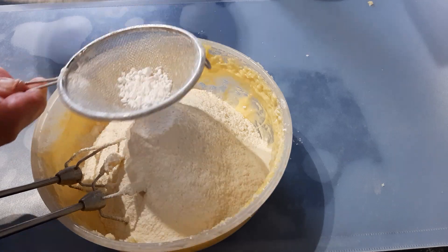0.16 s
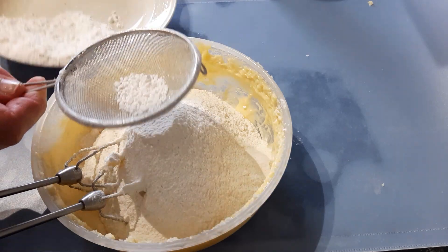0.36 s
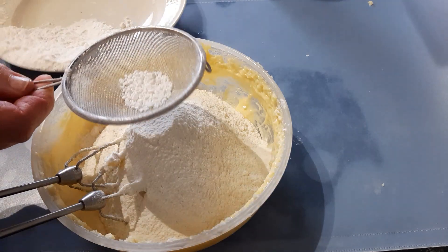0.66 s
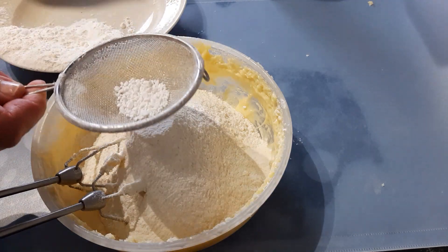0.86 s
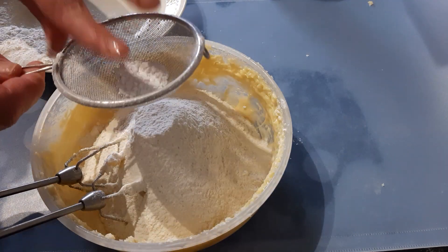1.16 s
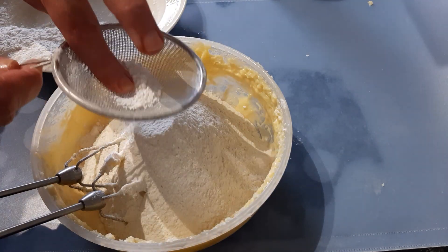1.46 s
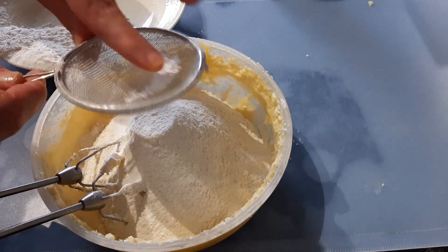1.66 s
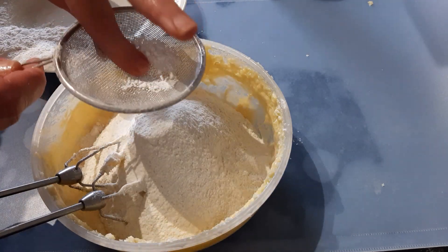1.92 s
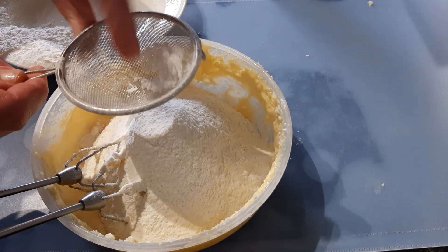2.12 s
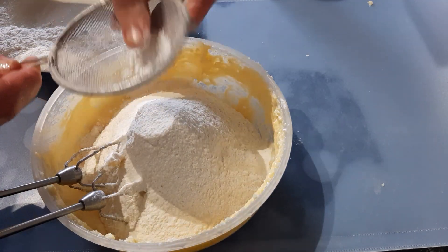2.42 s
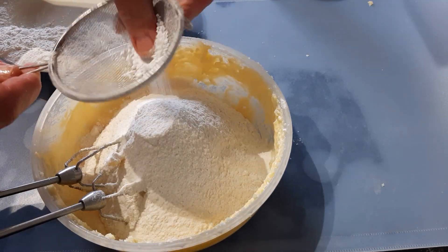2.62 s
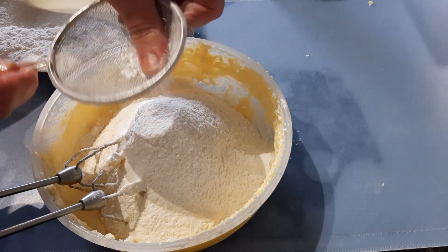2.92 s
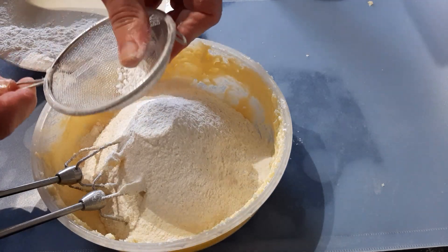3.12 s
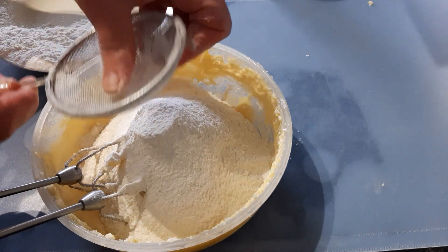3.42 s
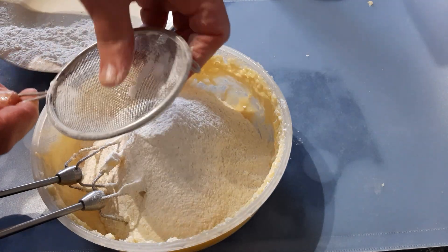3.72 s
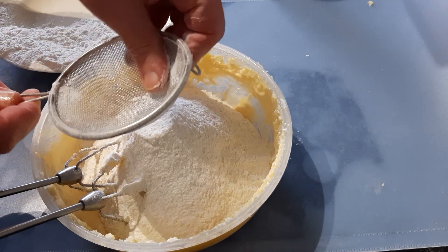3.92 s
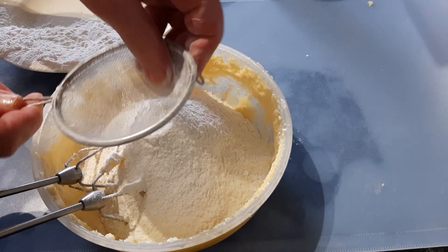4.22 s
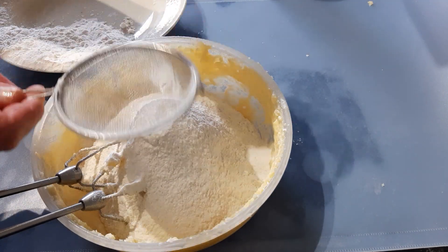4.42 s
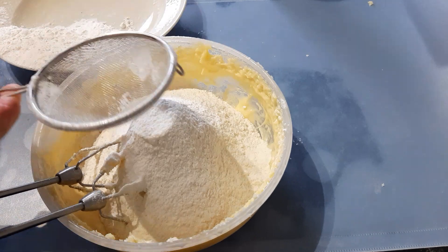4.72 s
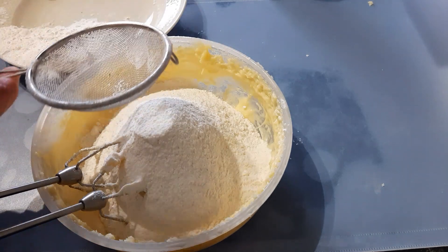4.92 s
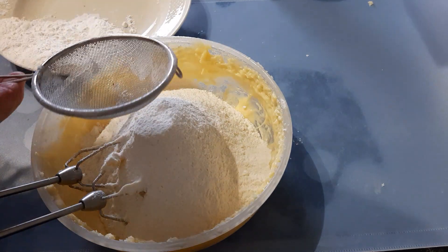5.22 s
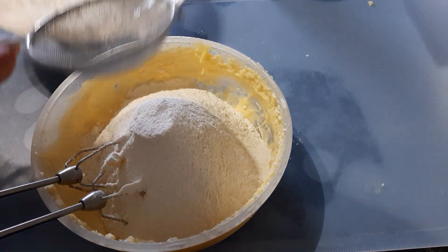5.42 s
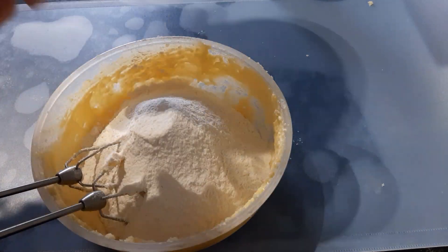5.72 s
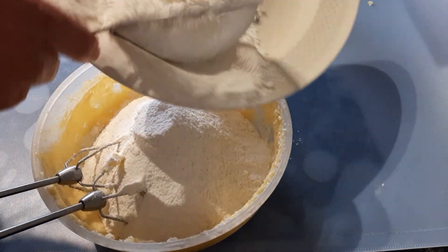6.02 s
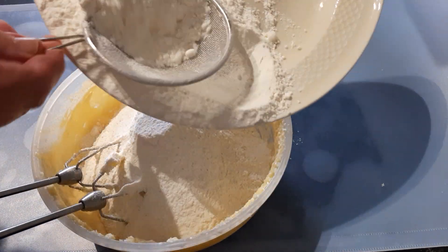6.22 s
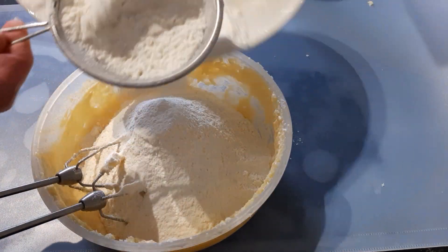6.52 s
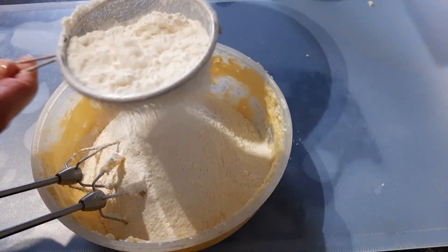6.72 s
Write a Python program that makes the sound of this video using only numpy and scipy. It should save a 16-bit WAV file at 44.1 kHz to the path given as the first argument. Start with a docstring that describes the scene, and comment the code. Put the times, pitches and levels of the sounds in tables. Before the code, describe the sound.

A low, wavering rumble leaning left, faint smooth hiss and barely audible electrical tones run throughout, closely miked in a small room. At 0 s a brief powdery hiss fades. At about 0.4 s a dish thumps hollowly on the table, the loudest event, rocking with more knocks at 0.57 and 0.7 s, and a short woody ring. After quiet, fingertip rubs begin around 1.4 s: small dry, bright grating dabs on wire mesh until 2.2 s, then longer, firmer strokes near 2.7, 3.0, 3.3, 3.6 and 3.9 s, the sharpest at 4.2 s. A deep hum sits under 3.8-5 s. A light hollow knock comes at 4.7 s, a soft dragging scuff at 5.1 s, another tick at 5.3 s. From 5.6 to 6.4 s the strainer scrapes with thin metallic ringing and crunches into flour, with a quick rattle around 6.1 s. Very soft sifting ends it.

```python
"""A low rumble, a faint hiss and thin electrical tones (wavering sines and filtered noise) run throughout.
A finger rubs flour on a small wire strainer (filtered grains); near the start a dish of flour rocks to rest
on the table with hollow thumps (decaying sines and noise). More rubs follow, and a deep hum comes for a second.
Small knocks (noise bursts) and a slide of the dish (grains) lead to the strainer scooping up more flour, with
crunching and ringing (grains through resonances). Soft sifting ends the scene."""
import sys
import numpy as np
from scipy import signal
from scipy.fft import rfft, irfft
from scipy.io import wavfile

SR = 44100
rng = np.random.default_rng(int(sys.argv[2]) if len(sys.argv) > 2 else 0)


def materialize(psi):
    """Save the field psi as 16-bit PCM at rate SR to the path in sys.argv[1].

    A 1-D psi becomes a single channel; in a 2-D psi each row is a channel.
    """
    bounded = np.clip(np.atleast_2d(psi).T, -1, 1)
    quanta = np.round(bounded * 32767).astype(np.int16)
    wavfile.write(sys.argv[1], SR, quanta)


N = 302481
T = np.arange(N) / SR  # time of every sample, in seconds

# hiss of powder on wire: pitch_hz, level_db
POWDER_COLOUR = [(1500, -42), (3300, -22.5), (4300, -0.5), (4750, -2.5), (5600, -0.5), (8000, 3),
                 (12000, 7), (15500, 7)]
# resonances of the strainer's wire rim: pitch_hz, width_hz, level_db
RIM_MODES = [(3850, 120, 4.5), (4930, 120, -2), (5350, 170, 0.5), (5720, 150, -0.5), (6220, 150, 3.5),
             (7530, 180, -5), (8400, 210, 0.5), (9470, 160, 0.5), (10930, 190, -2), (12100, 300, -11),
             (13100, 320, -4.5), (14900, 310, -6)]


def undb(db):
    """Turn decibels into a gain."""
    return 10 ** (np.asarray(db) / 20)


def unit(x):
    """Scale a sound to an rms of 1."""
    return x / np.sqrt(np.mean(x ** 2))


def along(points, hz):
    """Read (pitch_hz, value) points along a logarithmic pitch axis."""
    f, value = np.transpose(points)
    return np.interp(np.log(hz + 1), np.log(f), value)


def shaped(x, gain, size=8192):
    """Filter a sound with a gain that depends on pitch, without any sound before its cause."""
    hz = np.arange(size // 2 + 1) * SR / size
    cepstrum = irfft(np.log(gain(hz) + 1e-7))
    # folding the cepstrum forward gives a minimum-phase filter
    cepstrum[1:size // 2] *= 2
    cepstrum[size // 2 + 1:] = 0
    impulse = irfft(np.exp(rfft(cepstrum)))
    return signal.oaconvolve(x, impulse[None], axes=1)[:, :x.shape[1]]


def coloured(x, points):
    """Filter a sound with a (pitch_hz, level_db) curve."""
    return shaped(x, lambda hz: undb(along(points, hz)))


def resonance(hz, centre, width):
    """Gain of one resonance with steep flanks."""
    return 1 / (1 + (2 * (hz - centre) / width) ** 2)


def ringing(x, table):
    """Pass a sound through a set of (pitch_hz, width_hz, level_db) resonances."""
    return shaped(x, lambda hz: sum(undb(db) * resonance(hz, centre, width) for centre, width, db in table))


def pan(db):
    """Left and right gains for a left-minus-right level difference."""
    return undb(np.array([[db], [-db]]) / 2)


def noise(size=N):
    """Diffuse noise at two close microphones: alike in the bass, less related in the treble."""
    mid, side = rng.standard_normal((2, size))
    treble_only = signal.butter(1, 600, "high", fs=SR, output="sos")
    side = signal.sosfilt(treble_only, side)
    return np.array([mid + side, mid - side]) / np.sqrt(2)


def walk(rate):
    """Slow random wander with a spread near 1, taking `rate` steps a second."""
    steps = rng.standard_normal(int(N / SR * rate) + 2)
    return np.interp(T * rate, np.arange(len(steps)), steps)


def grains(rate, unevenness):
    """A dense rain of tiny clicks, about `rate` a second, with sizes spread by `unevenness`."""
    lands = rng.random(N) < rate / SR
    sizes = np.exp(unevenness * rng.standard_normal(N))
    return unit(lands * sizes * noise())


def fade(t60, size=SR):
    """Exponential decay of unit energy that drops 60 dB in t60 seconds."""
    shape = np.exp(-np.log(1000) * T[:size] / t60)
    return shape / np.sqrt(np.sum(shape ** 2))


def add(out, s, sound):
    """Mix a sound in at s seconds."""
    start = int(s * SR)
    out[:, start:start + sound.shape[1]] += sound[:, :N - start]


def tone(hz, waver, jitter_s=0):
    """A sine of rms near 1 whose phase and level wander."""
    clock = T + jitter_s * walk(220)
    wave = np.sin(2 * np.pi * hz * clock + waver * walk(16))
    return np.sqrt(2) * wave * undb(2 * waver * walk(5))


def swell(start, db, rise, fall):
    """Gain of one rubbing movement: it builds to a peak and dies away."""
    depth_db = 21.5  # how far under its peak the gain is at the start and after the fall time
    shape = 1.62  # 1 is a pointed peak, 2 a round one
    since_peak = T - start - rise
    distance = np.maximum(-since_peak / rise, since_peak / fall)
    return undb(db - depth_db * distance ** shape)


def held(start, db, length):
    """Gain that fades in, holds and fades out."""
    fade_s = .1
    time_to_edge = np.minimum(T - start, start + length - T)
    return undb(db) * np.clip(time_to_edge / fade_s, 0, 1)


def background():
    """A wavering, droning rumble, smooth hiss and thin steady tones, joined for a while by a deep hum."""
    # rumble level before mixing and panning: time_s, level_db
    rumble_levels = [(1.1, -64.5), (1.74, -70.5), (2.17, -62), (2.35, -71), (2.48, -64), (4.18, -65.5),
                     (4.24, -59), (4.4, -69), (5.06, -60.5), (5.24, -67), (6.52, -66.5), (6.68, -77),
                     (6.76, -59.5), (6.86, -66.5)]
    # spectrum of the rumble noise: pitch_hz, level_db
    rumble_colour = [(15, -39), (25, -14.5), (44, -10), (98, -3.5), (158, -9.5), (198, -9), (220, -10.5),
                     (248, -3), (275, -16), (297, -9), (325, -24.5), (413, -29), (533, -27), (574, -28.5),
                     (900, -39), (1170, -58), (1980, -120)]
    # droning tones inside the rumble: pitch_hz, level_db (against each other)
    drone_tones = [(87, -11), (100, -2.5), (124, -7.5), (170, -16.5), (198.5, -10.5), (247, -10),
                   (296, -16.5)]
    # deep hum that comes on, before panning: start_s, level_db, length_s
    hum_spells = [(3.8, -66.5, 1.2)]
    # steady hum and whine, before panning: pitch_hz, level_db
    whine_tones = [(46, -79), (59.2, -77.5), (3058, -89), (7300, -91)]
    # spectrum of the faint steady hiss: pitch_hz, level_db
    air_colour = [(300, -3), (600, -1.5), (1000, -9), (2000, -12), (5000, -19), (10000, -19), (15500, -16)]
    hum_hz = 59.67
    jitter_s = .00006  # timing jitter that widens the high whine

    drone = sum(undb(db) * tone(hz, waver=0.32) for hz, db in drone_tones)
    rumble_noise = unit(coloured(noise(), rumble_colour))
    level = undb(np.interp(T, *np.transpose(rumble_levels)))
    rumble = level * (undb(-4.5) * rumble_noise + undb(-4.0) * drone)
    hum = sum(held(*row) for row in hum_spells) * tone(hum_hz, waver=.2)
    low = (rumble + hum) * pan(10.5)
    whine = sum(undb(db) * tone(hz, waver=0.99, jitter_s=jitter_s) for hz, db in whine_tones)
    air = unit(coloured(noise(), air_colour))
    return low + undb(-76.5) * air * pan(1.5) + whine * pan(9.7)


def finger():
    """Powder grates through the wires and trickles on; firmer strokes also scrape the mesh itself."""
    # strokes or dabs on the mesh, or flour sifting through it; level is that of the powder hiss before mixing:
    # start_s, level_db, rise_s, fall_s
    strokes = [(0.0, -63, 0.0039, 0.095), (0.01, -71, 0.091, 0.32), (1.36, -67.5, 0.1, 0.14),
               (1.48, -61.5, .025, 0.036), (1.49, -67.5, 0.067, 0.089), (1.712, -63, 0.02, 0.033),
               (1.755, -71.5, .022, 0.031), (1.76, -65, .18, .19), (1.9, -61.5, 0.081, .11),
               (1.958, -58.5, 0.015, .025), (2.152, -65.5, 0.02, 0.047), (2.16, -77.5, .05, 0.15),
               (2.47, -67.5, 0.03, 0.15), (2.57, -58.5, .12, .095), (2.895, -67.5, 0.031, 0.11),
               (2.935, -52.5, 0.11, 0.071), (3.24, -53.5, 0.099, 0.074), (3.49, -59.5, 0.05, 0.087),
               (3.555, -52, .075, 0.072), (3.81, -63, 0.063, 0.064), (3.87, -57, 0.065, 0.083),
               (4.185, -49, 0.042, 0.091), (4.462, -73, 0.019, 0.086), (4.56, -75, 0.17, 0.24),
               (6.4, -76, 0.15, .25), (6.7, -76.5, 0.046, .25)]
    # lower voice of the mesh under a firm finger: pitch_hz, level_db
    mesh_colour = [(700, -11), (1400, -12), (1750, -9.5), (2000, -4), (2300, -3), (2700, -4), (3300, -4),
                   (4300, -1), (6000, 1.5), (10000, -9)]
    firm_db, mesh_db = -55, -11  # a firm stroke's hiss, and the mesh against it, before mixing
    mesh_growth = 1.4  # above 1, so the mesh grows faster than the hiss as the finger presses harder
    trickle_db, trickle_t60_s = -20, .5  # loose powder against the stroke, and how long it runs on

    rubbing = np.sqrt(sum(swell(*row) ** 2 for row in strokes))
    lingering_power = signal.oaconvolve(rubbing ** 2, fade(trickle_t60_s) ** 2)[:N]
    trickle = undb(trickle_db) * np.sqrt(np.abs(lingering_power))
    scraping = undb(firm_db + mesh_db) * (rubbing / undb(firm_db)) ** mesh_growth
    powder = unit(coloured(grains(rate=10000, unevenness=0.25), POWDER_COLOUR))
    hiss = np.hypot(rubbing, trickle) * powder
    mesh = scraping * unit(coloured(grains(rate=11000, unevenness=0.17), mesh_colour))
    catching = undb(1.0 * walk(250))  # quick random flutter in level
    return catching * (undb(3.5) * hiss * pan(1) + undb(4.5) * mesh * pan(4.3))


def kitchen():
    """Diffuse reverberation of the room; the treble mostly dies sooner than the bass."""
    # colour of the room's answer: pitch_hz, level_db
    room_colour = [(50, -25.5), (85, -0.5), (170, -3.5), (310, 3), (400, -6), (480, 1.5), (800, -1.5),
                   (1200, -4.5), (1800, -11), (3000, -13), (3900, -2), (5000, 0.5), (15000, -15)]
    # how long each pitch region lasts: pitch_hz, t60_s (time to drop 60 dB)
    room_decay = [(80, .45), (300, .42), (1000, .38), (3000, 0.29), (8000, 0.32), (15000, .27)]
    wash = rfft(noise(size=SR))
    hz = np.arange(SR // 2 + 1)
    centres = [f for f, t60 in room_decay]
    tail = 0
    # each row of the identity matrix picks out one overlapping pitch band
    for (f, t60), share in zip(room_decay, np.eye(len(centres))):
        band = irfft(wash * np.interp(hz, centres, share))
        tail = tail + band * fade(t60)
    build_up = 1 - np.exp(-T[:SR] / 0.0069)
    return coloured(tail * build_up, room_colour)


def dish():
    """Each blow rings the same table and room; a softer contact takes away the treble."""
    # the dish meets the table; levels are relative, the click's against the blow:
    # time_s, level_db, contact_cutoff_hz, click_level_db, left_minus_right_db
    thumps = [(0.4149, 4.5, 1460, -34.5, 2), (0.427, -12, 694, -50.5, -0.5), (0.444, -19, 1166, -49, 1.5),
              (0.474, -16, 606, -35, 0), (0.5734, -1.5, 1120, -41, 3), (0.682, -8.5, 1200, -66.5, 5),
              (0.689, -3, 1120, -38.5, 3), (0.7142, -0.5, 1810, -28, 2.5)]
    # table top and dish ring together, at relative levels, with a pan added to the thump's:
    # pitch_hz, level_db, t60_s, left_minus_right_db
    table_modes = [(87.5, -13, 0.15, 3.5), (99.7, -4, .42, 8.5), (138.27, -5.5, 0.63, 8),
                   (170.05, -9, 0.54, 3.5), (195.7, -6, 0.44, 4), (225, -1.5, .3, 1.5), (306.8, 3, .42, 0),
                   (342.1, 2, .2, 6.5), (450.3, 1.5, .17, -4), (523, 4.5, .3, -1), (654.5, -4, .36, -1),
                   (692, -5, 0.2494, 1), (737, -2.5, .22, 9), (871, -5.5, .24, 6), (846, -0.5, 0.36, 0.5),
                   (944, -2.5, 0.37, 0.5), (1034, -4.5, .19, 8), (1200, -4.5, 0.25, 0), (1160, -1, 0.11, 4),
                   (1226, -1, 0.14, 8), (1370, -13.5, 0.093, 3.5), (1520, -7.5, .3, 2.5),
                   (1539, -6, .25, -1.5)]
    # their dense, quickly damped upper modes: pitch_hz, level_db
    board_colour = [(55, -30), (90, -9.5), (220, -3.5), (330, -4.5), (400, -20), (460, 5), (750, 7),
                    (1150, 2), (1350, -7.5), (2500, -13), (6000, 0.5), (15000, -14)]

    t, modes = T[:SR], 0
    for hz, db, t60, pan_db in table_modes:
        # each mode radiates from its own patch of the table and reaches the two microphones at its own delay
        lag_s = .00032 * rng.standard_normal((2, 1))
        wave = np.sin(2 * np.pi * hz * (t - lag_s)) * np.exp(-np.log(1000) * t / t60)
        modes = modes + undb(db) * pan(pan_db) * wave
    board = coloured(noise(size=SR) * fade(0.03), board_colour)
    dense = undb(27) * board + undb(27.0) * kitchen()
    # the table top is too small to radiate the deepest bass
    no_deep_bass = signal.butter(3, 75, "high", fs=SR, output="sos")
    body = dense + undb(-29.0) * signal.sosfilt(no_deep_bass, modes)
    out = np.zeros((2, N))
    for s, db, contact_hz, click_db, pan_db in thumps:
        blow = shaped(body, lambda hz: 1 / np.sqrt(1 + (hz / contact_hz) ** 7))
        click = shaped(dense, lambda hz: hz / (hz + 1500) / np.sqrt(1 + (hz / 6000) ** 3))
        add(out, s, undb(db) * pan(pan_db) * (blow + undb(click_db) * click))
    return out


def ticks():
    """Light knocks of strainer and dish: a short hollow rattle with a glint of wire."""
    # small knocks, at relative levels, the wire's ring against the knock:
    # time_s, level_db, hollow_pitch_hz, t60_s, wire_ring_db
    knocks = [(4.711, -46, 492, 0.22, -34), (5.283, -51, 1020, 0.24, -30), (5.804, -55, 1190, 0.047, 4),
              (6.087, -35.5, 1120, 0.084, -22), (6.115, -33, 810, .018, -15.5),
              (6.152, -32.5, 810, 0.021, -20), (6.159, -28, 1060, 0.0068, -11.5),
              (6.164, -30, 945, 0.02, -12)]
    # spectrum of the knock itself: pitch_hz, level_db
    knock_colour = [(60, -53), (200, -12), (550, -41), (1800, -11.5), (3300, -18), (6000, -26), (8000, -28),
                    (15000, -46)]
    out = np.zeros((2, N))
    for s, db, pitch_hz, t60, wire_db in knocks:
        burst = noise(size=SR) * fade(t60)
        hollow = shaped(burst, lambda hz: resonance(hz, pitch_hz, .4 * pitch_hz))
        wire = undb(wire_db) * ringing(burst, RIM_MODES)
        add(out, s, undb(db) * (hollow + coloured(burst, knock_colour) + wire))
    return undb(28.5) * out * pan(7.6)


def slide():
    """The foot of the dish drags briefly over the tablecloth, a rush of tiny scuffs."""
    # the dish slides and scuffs as it is picked up, levels before mixing: start_s, level_db, rise_s, fall_s
    slides = [(5.025, -63, 0.094, 0.14), (5.274, -77, 0.017, 0.14), (5.43, -81, 0.046, 0.098)]
    # spectrum of the scuffing: pitch_hz, level_db
    scuff_colour = [(100, -7), (200, 5.5), (420, -0.5), (700, -8), (1500, -15), (3000, -15), (6000, -23),
                    (11000, -20.5), (15000, -31)]
    dragging = sum(swell(*row) for row in slides)
    scuffs = unit(coloured(grains(rate=12000, unevenness=0.35), scuff_colour))
    return undb(5.0) * dragging * scuffs * pan(4.2)


def scoop():
    """Packed flour crunches in small slips while the rim scrapes along the dish and rings."""
    # pushes of the strainer as it dips into the flour, digs and lifts, levels before mixing:
    # start_s, crunch_db, wire_ring_db, rise_s, fall_s
    pushes = [(5.55, -79.5, -74, 0.066, .14), (5.695, -69.5, -76, 0.067, 0.15),
              (5.79, -70.5, -67, 0.099, .15), (5.92, -69.5, -61, 0.2, 0.12), (6.06, -61, -72, 0.067, .07),
              (6.149, -60, -72, 0.057, 0.15), (6.215, -65, -76, .04, 0.04), (6.255, -73, -70, 0.044, 0.089),
              (6.345, -76, -72, 0.036, 0.18)]
    # spectrum of the crunch: pitch_hz, level_db
    crunch_colour = [(300, -30), (460, -11.5), (600, -1), (1150, -0.5), (1400, -6), (2100, -5),
                     (3400, -11.5), (4800, -6), (6200, -20), (7200, -16.5), (15000, -42)]
    # the hollow of the dish colours the crunch: pitch_hz, width_hz, level_db
    hollow_modes = [(581, 68, 1), (664, 34, -3), (715, 29, -5.5), (870, 35, -4.5), (1026, 67, -5),
                    (1140, 53, -5), (1208, 37, 4.5), (1860, 34, -4), (2193, 55, -2.5)]

    slips = grains(rate=5000, unevenness=.35) * undb(1.6 * walk(60))
    packed = unit(coloured(slips, crunch_colour))
    hollow = unit(ringing(slips, hollow_modes))
    crunch = undb(-2) * packed + undb(-2.0) * hollow
    scrape = grains(rate=7400, unevenness=0.32) * undb(2.0 * walk(41))
    # the contact point moves round the rim, so four groups of resonances swell independently
    rings = sum(ringing(scrape, RIM_MODES[k::4]) * undb(4.5 * walk(28)) for k in range(4))
    wire = unit(rings) + undb(-3) * unit(coloured(scrape, POWDER_COLOUR))
    digging = sum(swell(s, crunch_db, rise, fall) for s, crunch_db, wire_db, rise, fall in pushes)
    scraping = sum(swell(s, wire_db, rise, fall) for s, crunch_db, wire_db, rise, fall in pushes)
    return (undb(4) * digging * crunch + scraping * wire) * pan(5.7)


def scene():
    """Everything on and around the table."""
    return background() + finger() + dish() + ticks() + slide() + scoop()


def record(dry):
    """The microphone sheds the deepest bass and rounds the loudest peaks; the top of the treble is cut."""
    no_deep_bass = signal.butter(4, 40, "high", fs=SR, output="sos")
    thinned = signal.sosfilt(no_deep_bass, dry)
    rounded = thinned / (1 + (thinned / .97) ** 6) ** (1 / 6)
    treble_cut = signal.ellip(10, .2, 70, 15850, fs=SR, output="sos")  # steep cut above 15850 Hz
    return signal.sosfilt(treble_cut, rounded)


dry = scene()
out = record(dry)
materialize(out)
```